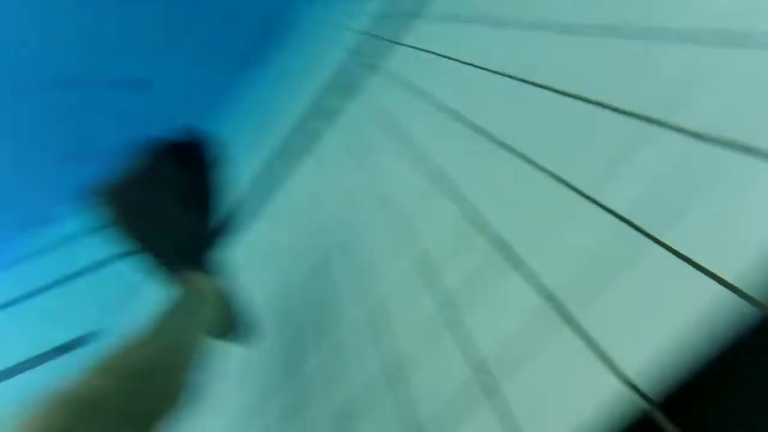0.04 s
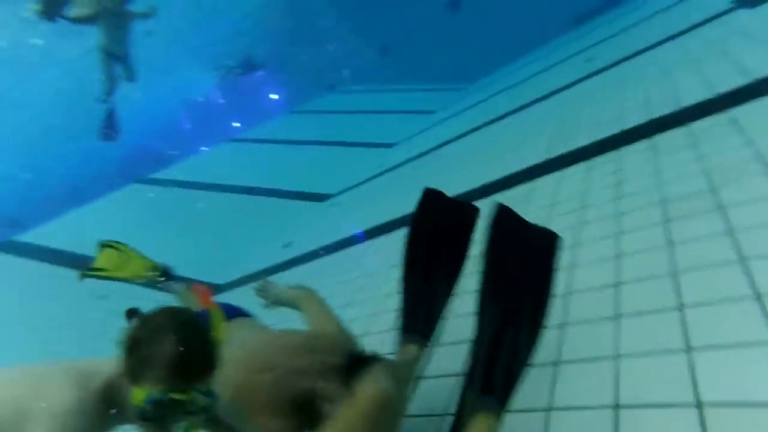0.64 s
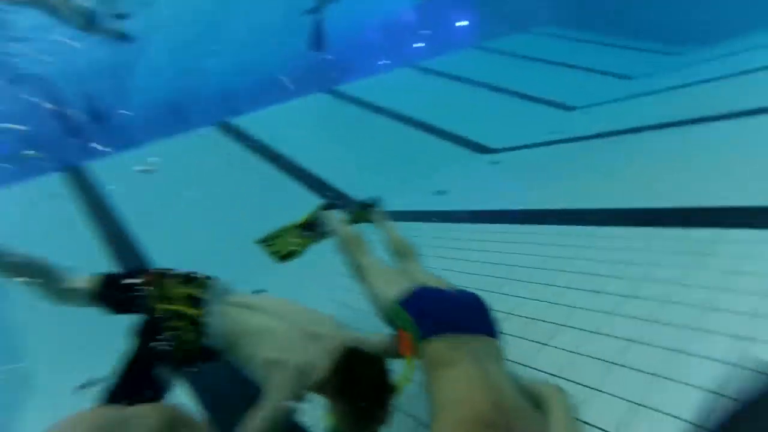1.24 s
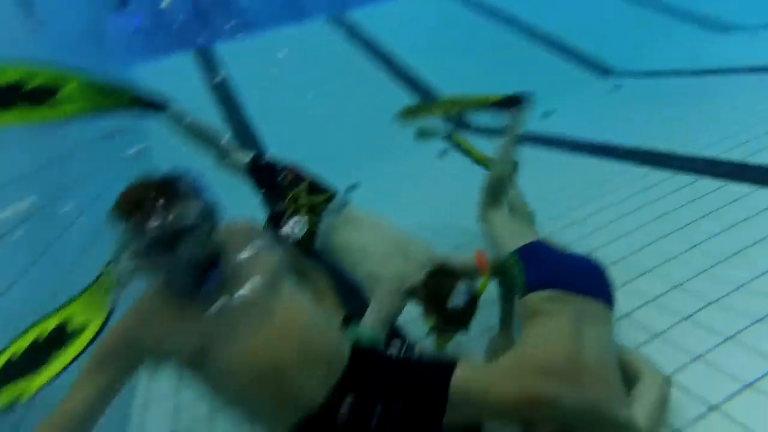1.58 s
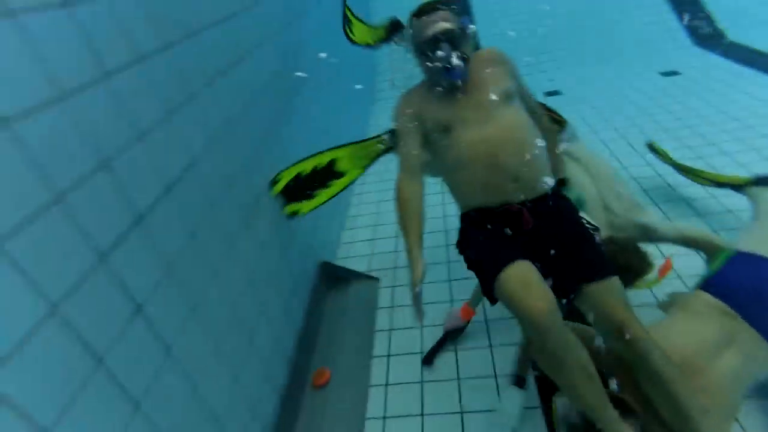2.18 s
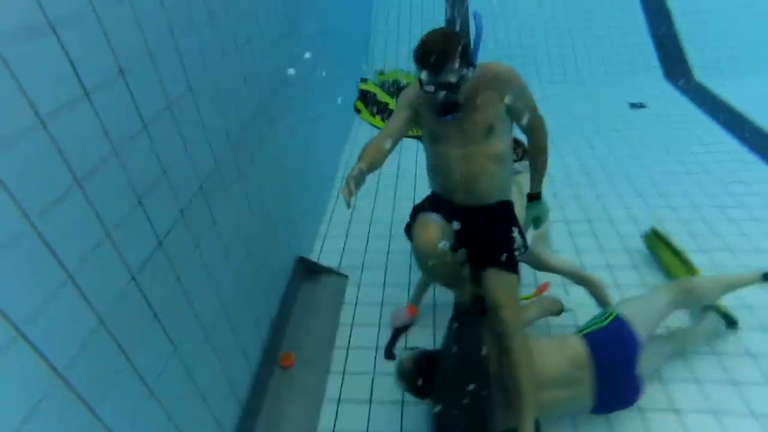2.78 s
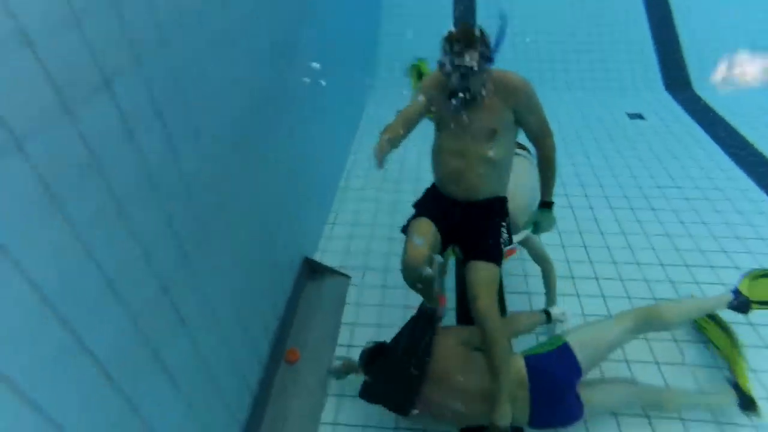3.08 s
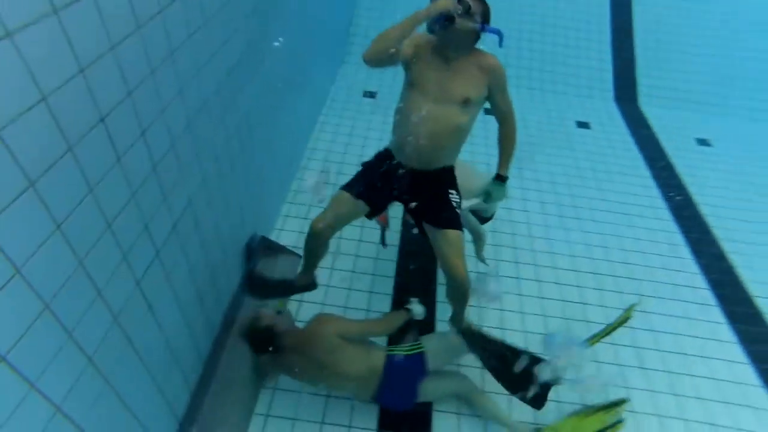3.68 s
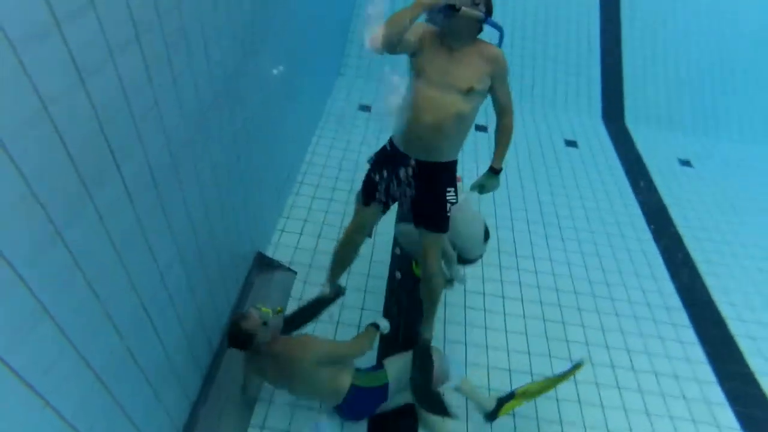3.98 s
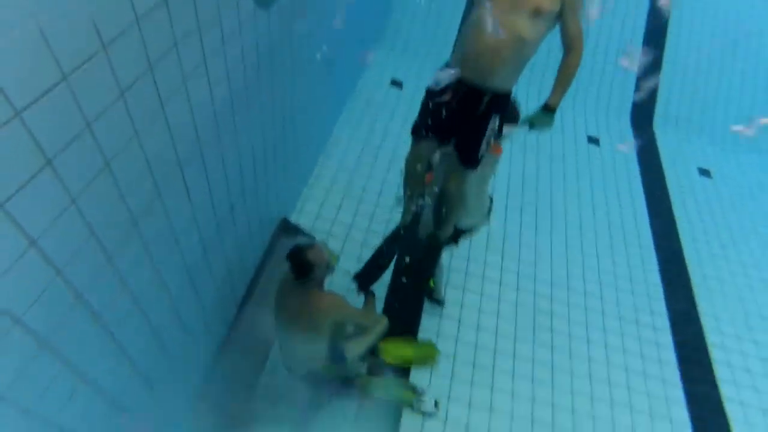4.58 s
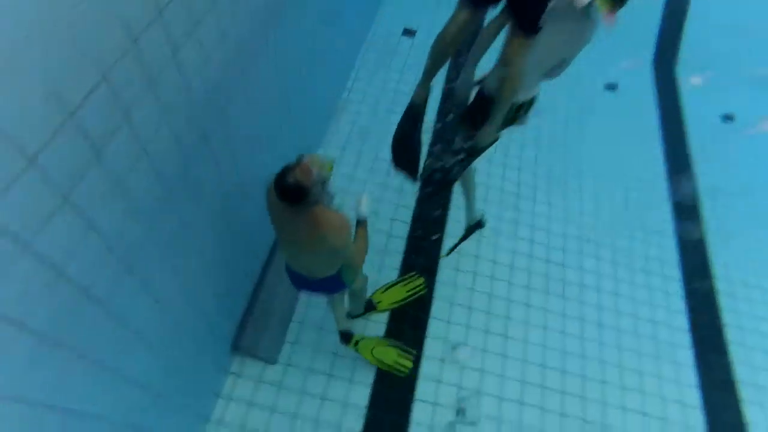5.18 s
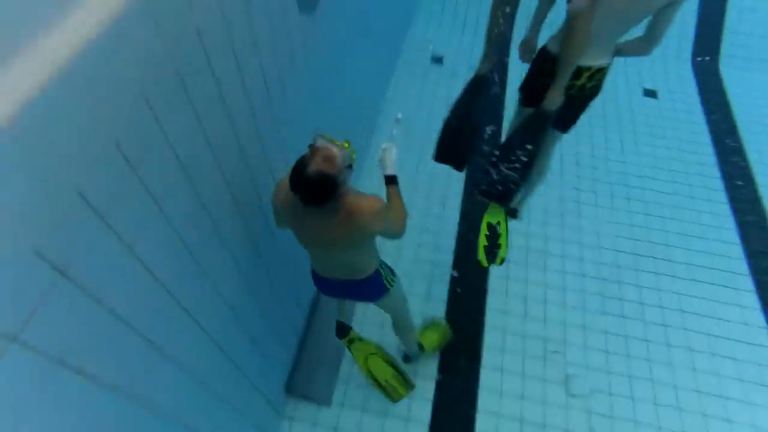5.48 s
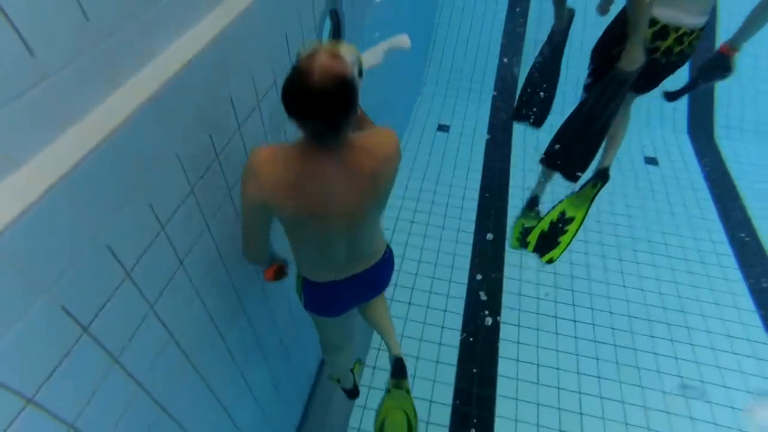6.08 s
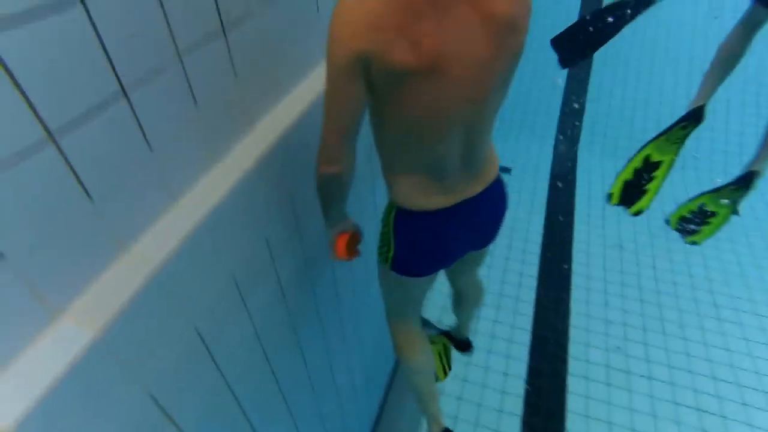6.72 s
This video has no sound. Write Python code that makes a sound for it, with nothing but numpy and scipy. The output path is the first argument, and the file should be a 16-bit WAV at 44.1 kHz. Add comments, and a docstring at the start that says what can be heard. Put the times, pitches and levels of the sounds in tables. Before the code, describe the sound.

Underwater in a swimming pool, water rumbles against a camera housing while fins churn up a dull, fizzing wash. Sticks and a puck clack on the tiled floor, and about two seconds in the puck booms and rattles into a steel tray. Tiny bubbles pop past, then big gulps of air break loose around four seconds. A short rising blurt of air comes near the end, and the water settles.

```python
"""Underwater hockey, heard from a camera housing near the pool floor. From the start, flow rumbles on the
housing, fins churn up a fizzing wash and sticks and puck clack on the tiles; air gulps, small bubbles
plink and the pool rings in answer. At 2 s the puck booms and rattles into the steel goal tray. Tiny bubbles
pop past, a jet swishes out, and just after 4 s the biggest gulps break loose. Near 6 s comes one rising
blurt of air, then the water settles."""
import sys
import numpy as np
from scipy import signal
from scipy.fft import rfft, irfft, next_fast_len
from scipy.io import wavfile
from scipy.ndimage import uniform_filter1d, map_coordinates

SR = 44100
rng = np.random.default_rng(int(sys.argv[2]) if len(sys.argv) > 2 else 0)


def generate_wav(sig):
    """Save sig (samples, or channels by samples) to the path in sys.argv[1] as 16-bit PCM at SR."""
    pcm = np.round(np.clip(np.atleast_2d(sig).T, -1, 1) * 32767).astype(np.int16)
    wavfile.write(sys.argv[1], SR, pcm)


N = 302085

# Levels are relative, ahead of each layer's own gain. A colour is the spectral shape of a noise.
# flow round the moving housing: (time [s], level [dB])
FLOW_LEVEL = [(0, -17.5), (.6, -21.5), (1.7, -24.5), (2.25, -23.5), (2.8, -25.5), (3.7, -25), (4.25, -24),
              (4.7, -29), (5.3, -25), (6.85, -32)]
# its rumble: (frequency [Hz], level [dB])
RUMBLE_COLOUR = [(5, 17.5), (12, 9), (20, 1), (32, -4), (50, -16), (80, -24.5), (140, -33), (250, -40.5),
                 (500, -75.5), (1000, -89.5)]
# how hard the fins churn: (time [s], level [dB])
CHURN_LEVEL = [(0.0, -39), (0.82, -44.5), (1.43, -35.5), (1.96, -38.5), (2.27, -36.5), (2.82, -43),
               (3.28, -38.5), (3.7, -39.5), (4.25, -32.5), (4.7, -36), (5.13, -35), (5.38, -47.5),
               (5.59, -45), (5.76, -38), (6.14, -41), (6.32, -46), (6.85, -52)]
# the dull rush of stirred water: (frequency [Hz], level [dB])
RUSH_COLOUR = [(60, -47.5), (150, -14), (240, -11), (320, -1), (420, 2.5), (510, 8.5), (600, -9),
               (730, -13), (900, -11.5), (1050, -48), (1600, -43), (3000, -70)]
# standing waves between floor and wall: (frequency [Hz], level [dB])
STANDING_WAVES = [(146, -7), (178, -4), (326, 3.5), (352, -2), (385, -3.5), (456, 0.5), (484, -1.5),
                  (514, 0.5), (541, 0.5), (582, -2.5), (665, -1.5), (748, -2)]
# the hollow haze round gulps and wash: (frequency [Hz], level [dB])
HAZE_COLOUR = [(900, -6), (1300, -24), (1690, 14), (2300, -15), (2850, 5.5), (3400, -32.5), (4020, 6.5),
               (4500, -37.5), (5150, 0), (5750, -28.5), (6400, -6.5), (7600, -9.5), (10500, -14.5),
               (15000, -9.5)]
# the bed of fine fizz and far clatter: (time [s], level [dB])
FIZZ_LEVEL = [(0.0, -54.5), (0.67, -67.5), (0.93, -71), (1.22, -63), (1.96, -64), (2.21, -51), (2.4, -60),
              (3.15, -68), (3.81, -70), (3.97, -73), (4.67, -75.5), (5.49, -69), (5.82, -67), (6.85, -67.5)]
# that bed's tone: (frequency [Hz], level [dB])
BED_COLOUR = [(500, 3.5), (900, 7), (1400, -8), (2100, -5), (2800, 5.5), (3500, -17.5), (4700, -10.5),
              (6000, -32), (7400, -30.5), (10000, -22.5), (15000, -32.5)]
# the faint hiss on top: (frequency [Hz], level [dB])
TOP_HISS_COLOUR = [(1000, -2), (3500, 0), (4800, 5), (6000, 0), (7400, 7.5), (8500, 0), (9700, 3.5),
                   (12000, -4), (15500, -11.5)]
# the lower, swelling part of the fizz: (frequency [Hz], level [dB])
SEETHE_COLOUR = [(800, -8), (1200, 1), (1800, 1), (2400, -0.5), (3200, -19)]
# sticks and puck on the tiles: (time [s], level [dB], pool echo [dB], ring [dB])
TILE_HITS = [(0.0, -35, -3, -21), (0.0823, -27.5, -23, -17), (1.526, -29.5, -17, -7),
             (1.531, -35.5, -13, -14), (1.862, -41, -18, -13), (2.003, -38.5, -14, -16),
             (2.582, -49, -25, -14), (2.5881, -23, -16.5, -1), (2.5915, -28, -12, -6),
             (2.676, -43.5, -4.5, -8)]
# the crack of such a blow: (frequency [Hz], level [dB])
CRACK_COLOUR = [(400, -12), (900, -11), (1650, -9.5), (1950, -0.5), (2750, 4.5), (3100, -8.5), (3400, -20),
                (3900, -8.5), (4800, -19), (6200, -23), (7500, -18.5), (8300, -35), (9600, -18.5),
                (12000, -40), (15500, -36)]
# its ring: (frequency [Hz], level [dB])
BLOW_MODES = [(2000, -2.5), (2223, -2), (2471, -9.5), (2573, -4), (2678, 2.5), (2790, -10)]
# dark, low ringing notes: gulps of air, and at 2.03 s the boom of the puck meeting the tray:
# (time [s], level [dB], pitch [Hz], t60 [s], deep level [dB], deep pitch [Hz])
DARK_NOTES = [(0.079, -4.5, 560, 0.012, -39.5, 347), (0.284, -13.5, 510, 0.019, -52, 402),
              (0.323, -17.5, 569, 0.092, -47, 415), (0.866, -16.5, 460, 0.033, -35, 386),
              (0.87, -29.5, 714, 0.13, -45, 391), (0.971, -21.5, 489, 0.088, -39, 304),
              (1.272, -20.5, 510, 0.15, -37, 413), (1.424, -19, 550, 0.12, -46, 420),
              (1.486, -26, 466, 0.54, -34, 276), (1.528, -19.5, 526, 0.12, -50, 432),
              (1.686, -25, 457, 0.16, -29.5, 412), (1.175, -26.5, 478, 0.093, -40, 394),
              (1.865, -23.5, 453, 0.13, -34, 381), (2.032, -19.5, 520, 0.095, -34, 408),
              (2.259, -37, 505, 0.083, -24, 317), (2.472, -20.5, 537, 0.097, -33.5, 423),
              (2.553, -19, 427, 0.037, -33, 299), (2.663, -31, 503, 0.12, -30.5, 303),
              (3.324, -14.5, 490, 0.042, -39, 407), (3.578, -6, 500, 0.016, -22, 299.6),
              (3.792, -17, 398, 0.15, -20.5, 303), (3.942, -13.5, 613, 0.037, -16.5, 330.5),
              (4.044, 1, 571.5, 0.063, -7, 354.8), (4.061, -9, 620, 0.055, -18, 370),
              (4.082, -10.5, 539, 0.13, -14, 380), (4.162, -12, 546.4, 0.23, -28.5, 171.5),
              (4.131, -2, 460, 0.037, -12.5, 400), (4.189, -21, 540, .08, -18, 315),
              (4.297, -22, 482, .05, -23.5, 341), (4.33, -20, 546, 0.09, -21, 312.4),
              (4.381, -4, 483, 0.075, -17.5, 374.6), (4.472, -38, 525, 0.088, -20.5, 331.5),
              (4.545, -16.5, 551, 0.2, -21.5, 314), (4.602, -10.5, 497, 0.037, -19.5, 340.6),
              (4.7, -33, 456, .25, -26.5, 325), (4.817, -24.5, 512, 0.5, -21, 350),
              (4.9, -28, 524, 0.15, -23.5, 342.7), (4.994, -28.5, 571, 0.15, -35, 346),
              (5.148, -18, 503, 0.062, -29, 378.4), (5.225, -23, 520, 0.051, -50, 367),
              (5.282, -24, 554, 0.034, -41, 370), (5.365, -22.5, 612, 0.073, -37, 380),
              (5.579, -25.5, 414, 0.078, -28.5, 370), (5.6625, -13.5, 640, 0.03, -19, 384.7),
              (5.833, -15, 630, 0.04, -16.5, 410.3), (5.867, -12, 428, 0.13, -35, 394),
              (6.266, -34.5, 544.6, 0.31, -30, 366)]
# dry ticks on the housing: (time [s], level [dB], centre [Hz])
HOUSING_TICKS = [(0.082, -19.5, 8400), (0.1236, -36, 4000), (0.162, -29, 3200), (1.4223, -29, 3900),
                 (0.287, -35, 3050), (3.146, -38, 4100), (3.2889, -34, 6500), (3.755, -35, 6760),
                 (3.467, -39.5, 4910), (3.7254, -34.5, 3400), (4.0457, -16, 3560), (4.0986, -24, 8830),
                 (4.2964, -23.5, 3250), (4.4108, -9.5, 4130)]
# air tearing loose: (crest time [s], level [dB], pitch [Hz], half length [s])
AIR_TEARS = [(0.326, -37.5, 820, .0065), (1.26, -44, 880, .006), (0.655, -39.5, 860, .012),
             (3.056, -36, 700, .006), (3.17, -43, 900, .009), (3.335, -40, 720, .007),
             (3.365, -37.5, 850, .012), (3.412, -31.5, 790, .007), (3.435, -42, 870, .008),
             (3.8, -28, 760, .0072), (3.893, -44, 1180, .016), (4.048, -2, 315, .004),
             (4.085, -22, 428, .012), (4.146, -11, 335, .0035), (4.154, -17, 230, .008),
             (4.177, -17, 165, .007), (4.198, -21, 543, .018), (4.25, -30, 178, .025),
             (4.368, -40, 1050, .008), (4.386, -27, 880, .006), (4.52, -27, 450, .011),
             (4.731, -28, 455, .012), (5.151, -34.5, 680, .01), (5.227, -22, 368, .014),
             (5.538, -32.5, 617, .009), (5.942, -34, 720, .01), (5.962, -43, 920, .009),
             (6.14, -39, 700, .012)]
# small bubbles pinching off close by: (time [s], level [dB], nominal pitch [Hz], t60 [s])
NEAR_BUBBLES = [(0.615, -52.5, 1780, 0.032), (0.749, -54, 1350, .04), (0.973, -45.5, 1870, 0.044),
                (1.033, -51.5, 1290, 0.089), (1.1622, -39, 1140, 0.025), (1.822, -42.5, 2200, 0.019),
                (2.47, -46.5, 2250, 0.061), (2.748, -49, 1250, .035), (2.869, -49, 2050, 0.026),
                (2.9121, -36.5, 1276, 0.04), (2.913, -35, 2400, 0.017), (3.011, -56, 1370, 0.026),
                (3.035, -49.5, 2500, .025), (3.089, -50.5, 2430, 0.026), (3.1782, -29.5, 1257, 0.021),
                (3.5052, -30, 1680, .025), (3.581, -33, 1048, 0.077), (3.727, -38.5, 1325, 0.04),
                (3.795, -24.5, 840, 0.086), (3.8893, -32, 1090, 0.049), (4.0455, -12, 1400, 0.01),
                (4.082, -27, 1970, 0.019), (4.129, -21.5, 2200, 0.033), (4.279, -30, 1370, 0.0053),
                (4.298, -37.5, 1300, 0.012), (4.382, -27.5, 956, 0.054), (4.5522, -41.5, 1730, 0.043),
                (4.606, -35, 1063, 0.043), (5.032, -47.5, 2440, 0.026), (5.3575, -36.5, 1250, 0.016),
                (6.0912, -46, 2560, 0.029)]
# ragged runs of small bubbles: (time [s], level [dB], length [s], centre [Hz])
BUBBLE_RUNS = [(0.63, -49, .06, 840), (0.97, -42, .012, 2090), (1.074, -48, .015, 2500),
               (1.085, -52, 0.036, 1350), (1.106, -45, 0.021, 2380), (1.162, -43, 0.023, 2020),
               (1.228, -50, 0.009, 1900), (1.606, -48.5, 0.047, 1490), (3.309, -50, .13, 876),
               (3.764, -46, 0.0067, 1950), (3.886, -44, 0.047, 1040), (3.889, -38, .01, 1820)]
# deep swells of water, mostly after big gulps and the tray crash: (crest time [s], level [dB], t60 [s])
LOW_SURGES = [(0.95, -36, 1.2), (2.14, -33, 0.85), (2.45, -32.5, 1.2), (4.16, -26, 1.1),
              (4.52, -35.5, 0.47), (5.87, -35, 0.51)]
# the puck rattling in the goal tray: (time [s], level [dB])
PUCK_CONTACTS = [(2.032, -44.5), (2.080, -29), (2.094, -31), (2.105, -34.5), (2.119, -33.5), (2.154, -32.5),
                 (2.183, -36.5), (2.247, -42.5), (2.354, -51.5)]
# the steel's ring: (frequency [Hz], level [dB])
STEEL_MODES = [(1985, -8), (2234, -20.5), (2680, -8), (4174, -10.5)]
# the tray's clatter: (frequency [Hz], level [dB])
CLATTER_COLOUR = [(200, -11), (490, 14), (750, 1), (1500, -3), (2100, 3.5), (2850, 5), (3400, -13.5),
                  (4200, -2.5), (5100, -27), (6500, -23)]
# its bright grit: (frequency [Hz], level [dB])
STEEL_GRIT_COLOUR = [(3500, -22), (5000, 4.5), (6300, -11), (7400, 5), (8400, -3), (9700, 3), (12500, -17),
                     (15700, -22)]
# puffs of very fine bubbles: (crest time [s], level [dB], half length [s])
SPRAY_PUFFS = [(3.358, -64, 0.068), (5.737, -63, 0.09)]
# the blurt's harmonics, lowest first: (level [dB])
BLURT_HARMONICS = [-25.5, -18, -15]
# the jet of fine bubbles: (frequency [Hz], level [dB])
JET_COLOUR = [(900, -10), (1400, 1), (1900, 9), (2850, 6), (3500, -9), (4700, -3), (6000, -15), (7500, -3),
              (9700, -7), (12000, -16), (15500, -24)]
# deep water surge, bubble snap, tray boom and fine spray: (frequency [Hz], level [dB])
SURGE_COLOUR = [(50, -0.5), (110, -0.5), (200, -5.5), (280, 2), (400, -25)]
SNAP_COLOUR = [(600, -1.5), (1200, 14), (2700, 1.5), (5000, -14.5), (15000, -23)]
BOOM_COLOUR = [(280, -9), (400, -15.5), (460, 3), (520, -1), (590, -10), (800, -24.5)]
SPRAY_COLOUR = [(1000, 5), (1900, -2.5), (2800, 10.5), (3500, -3.5), (6000, -4.5), (8500, -0.5),
                (15000, -27)]

TIME = np.arange(N) / SR


def amp(db):
    """Decibels to gain."""
    return 10 ** (np.asarray(db) / 20)


def unit(x):
    """x at rms 1."""
    return x / np.sqrt(np.mean(x ** 2) + 1e-20)


def clock(seconds):
    """Sample times over a duration."""
    return np.arange(int(seconds * SR)) / SR


def fade(t, t60):
    """Exponential decay, 60 dB down at t60."""
    return np.exp(-np.log(1000) * t / t60)


def onset(t, attack):
    """A rise from 0 to 1 with time constant attack [s]."""
    return 1 - np.exp(-t / attack)


def swell(t, half):
    """A bell-shaped envelope cresting at t = 0."""
    return np.exp(-.5 * (t / half) ** 2)


def curve(rows):
    """(time [s], value) rows as one value per sample."""
    return np.interp(TIME, *np.transpose(rows))


def wobble(rate):
    """A smooth random curve, rate knots a second."""
    return map_coordinates(rng.standard_normal(int(N * rate / SR) + 4), [TIME * rate])


def noise(colour, size):
    """Noise of rms 1 in the given colour."""
    padded = next_fast_len(size + 8192)
    hz, db = np.transpose(colour)
    log_bins = np.log(np.fft.rfftfreq(padded, 1 / SR) + 1)
    gain = amp(np.interp(log_bins, np.log(hz), db, left=-120, right=-120))
    return unit(irfft(rfft(rng.standard_normal(padded)) * gain, padded)[:size])


def patchy_noise(colour, depth_db, frame):
    """Coloured noise with random patches of gain in time and pitch; frame is in samples."""
    spectrum = signal.stft(noise(colour, N), nperseg=frame)[2]
    patches = uniform_filter1d(rng.standard_normal(spectrum.shape), size=4, axis=0)
    patches = unit(uniform_filter1d(patches, size=2, axis=1))
    return unit(signal.istft(spectrum * amp(depth_db * patches), nperseg=frame)[1][:N])


def partials(t, modes):
    """Steady sines at random phases, one for each mode."""
    return sum(amp(db) * np.sin(2 * np.pi * (hz * t + rng.random())) for hz, db in modes)


def add(track, s, sound):
    """Mix a sound into the track at time s."""
    part = track[max(round(s * SR), 0):][:len(sound)]
    part += sound[:len(part)]


def bubble(t, hz, t60, attack, glide=0):
    """Air pulsing in water: a damped sine whose pitch drifts by the share glide while it rings."""
    pitch = hz * (1 + glide * (1 - fade(t, t60)))
    return np.sin(2 * np.pi * np.cumsum(pitch) / SR) * fade(t, t60) * onset(t, attack)


def housing_rumble():
    """Eddies rumble on the housing, and one soft bump pushes it."""
    out, t = amp(curve(FLOW_LEVEL)) * noise(RUMBLE_COLOUR, N), clock(.15)
    bump = -amp(-2.5) * onset(t, .0021) ** 2 * fade(t, .078)
    add(out, 2.737, bump)
    return out


def fin_wash():
    """Fins stir a cloud of bubbles over a dull, uneven rush; a deep surge swells beneath."""
    cloud, t, count = np.zeros(N), clock(.13), 1100
    starts = rng.uniform(0, N / SR, count)
    for s, (pitch, life, size) in zip(starts, rng.standard_normal((count, 3))):
        hz = 470 * np.exp(.27 * pitch)
        ring = bubble(t, hz, t60=.17 * np.exp(.18 * life), attack=.00089, glide=.032)
        add(cloud, s, amp(3 * size - 2.3 * pitch ** 2) * ring)
    rush = patchy_noise(RUSH_COLOUR, depth_db=5.5, frame=2048)
    surge = patchy_noise(SURGE_COLOUR, depth_db=5.5, frame=2048)
    churn = amp(-5) * unit(cloud) + amp(-1.5) * rush + amp(-15) * surge
    return amp(curve(CHURN_LEVEL)) * churn + surge_envelope() * surge


def pool_ring(drive, t60=.42):
    """The water between floor and wall rings on at its own pitches."""
    t = clock(t60)
    decay = fade(t, t60)
    waves = sum(amp(db) * np.cos(2 * np.pi * hz * t) for hz, db in STANDING_WAVES)
    return signal.fftconvolve(drive, waves * 2 * decay / decay.sum())[:N]


def hollow_edge(drive, spacing_hz=1143):
    """A metallic edge: faint side tones of the drive round an even comb of pitches, in a ringing haze."""
    t = clock(.2)
    comb = sum(np.cos(2 * np.pi * (k * spacing_hz * TIME + rng.random())) / k ** .92 for k in range(1, 11))
    haze = signal.fftconvolve(rng.standard_normal(N), noise(HAZE_COLOUR, len(t)) * fade(t, .28))[:N]
    envelope = np.sqrt(np.abs(uniform_filter1d(drive ** 2, size=130)))
    return amp(-37) * drive * unit(comb) + amp(-39) * envelope * unit(haze)


def fizz():
    """Far clatter and tiny bubbles: a flickering bed, a lower seethe, puffs of spray and a faint hiss."""
    level_db = curve(FIZZ_LEVEL)
    bed = amp(level_db + .5 + 2 * wobble(30)) * patchy_noise(BED_COLOUR, depth_db=4.5, frame=512)
    settle_db = 4 * np.maximum(TIME - 3.7, 0)  # dies down once the wrestling for the puck stops
    seethe_db = level_db - 5.5 + 3.5 * wobble(12) - settle_db
    seethe = amp(seethe_db) * patchy_noise(SEETHE_COLOUR, depth_db=4.5, frame=512)
    puffs = sum(amp(db) * swell(TIME - s, half) for s, db, half in SPRAY_PUFFS)
    spray = noise(SPRAY_COLOUR, N)
    hiss = patchy_noise(TOP_HISS_COLOUR, depth_db=3, frame=512)
    grain = amp(5 * wobble(370))
    return bed + seethe + puffs * unit(spray * grain) + amp(-74) * hiss


def crackle():
    """Countless tiny bubbles burst, a few louder than the rest; the smaller and later, the fainter."""
    out, t, count = np.zeros(N), clock(.02), 3200
    starts = rng.uniform(0, N / SR, count)
    for s, (pitch, accent) in zip(starts, rng.random((count, 2))):
        hz = 1500 * 7.5 ** pitch
        db = -64.5 + 19 * accent ** 30 - .6 * s - pitch
        add(out, s, amp(db) * bubble(t, hz, t60=26 / hz, attack=.00019))
    return out


def tile_clacks():
    """A hard blow on the tiles: a short crack and a tight ring, then the echo of the pool."""
    out, t = np.zeros(N), clock(.7)
    for s, db, echo_db, ring_db in TILE_HITS:
        echo = amp(echo_db) * fade(t, .23)
        crack = noise(CRACK_COLOUR, len(t)) * np.hypot(fade(t, .034), echo)
        ring = amp(ring_db) * partials(t, BLOW_MODES) * np.hypot(fade(t, .044), echo)
        add(out, s, amp(db) * (crack + ring) * onset(t, .00048))
    return out


def dark_notes():
    """Gulps of air and one tray boom ring with a main note and a deep one; the pool walls prolong them."""
    out, t = np.zeros(N), clock(.4)
    for s, db, hz, t60, deep_db, deep_hz in DARK_NOTES:
        attack = .0017 * (t60 / .029) ** .54  # short notes start suddenly, long ones swell
        deep = bubble(t, deep_hz, .23, attack)
        knock = amp(-5) * bubble(t, deep_hz, .038, attack)
        ring = amp(db) * bubble(t, hz, t60, attack) + amp(deep_db) * (deep + knock)
        walls = rng.standard_normal(len(t)) * fade(t, .45) * onset(t, .018)
        echo = signal.fftconvolve(ring, walls / np.linalg.norm(walls))[:len(t)]
        add(out, s, ring + amp(-19) * echo)
    return signal.sosfilt(signal.butter(4, 970, 'lowpass', fs=SR, output='sos'), out)


def housing_ticks():
    """Dry ticks on the housing, each a few milliseconds of noise in a broad hump."""
    out, t = np.zeros(N), clock(.04)
    octaves = np.linspace(-3, 3, num=13)
    hump_db = -6 * np.abs(octaves) ** 1.4 - 9 * np.maximum(octaves, 0)
    for s, db, hz in HOUSING_TICKS:
        burst = noise(np.c_[hz * 2 ** octaves, hump_db], len(t))
        add(out, s, amp(db - 8) * burst * fade(t, .0098) * onset(t, .00069))
    return out


def burble(clusters=22, until_s=3.8):
    """While the players wrestle for the puck, faint bubbles further off chirp in clusters of five."""
    out, t = np.zeros(N), clock(.06)
    starts = (rng.uniform(0, until_s, (clusters, 1)) + rng.uniform(0, .1, (clusters, 5))).ravel()
    for s, (pitch, size, drift) in zip(starts, rng.random((len(starts), 3))):
        hz = 827 * 2 ** (1.64 * pitch)
        ring = bubble(t, hz, t60=40 / hz, attack=.9 / hz, glide=.2 * (drift - .5))
        add(out, s, amp(-54 + 10.6 * size ** 2 - 4 * pitch) * ring)
    return out


def gurgle(crest_s, db, hz, half, rise_per_s=0):
    """Air tears loose in a swelling, ragged tone."""
    out, lead_s = np.zeros(N), .1
    t = clock(2 * lead_s) - lead_s
    jostle = uniform_filter1d(rng.standard_normal((2, len(t))), size=160)
    jitter, flutter = unit(uniform_filter1d(jostle, size=160))
    rough = .58 * (hz / 800) ** 1.4  # smaller bubbles jostle more
    phase = 2 * np.pi * hz * (t + rise_per_s * t ** 2 / 2) + rough * jitter
    add(out, crest_s - lead_s, amp(db + 2 * rough * flutter) * np.sin(phase) * swell(t, half))
    return out


def plinks():
    """Small bubbles snap free and ring briefly, starting sharp and sinking in pitch."""
    out, t = np.zeros(N), clock(.1)
    for s, db, hz, t60 in NEAR_BUBBLES:
        ring = bubble(t, hz * 1.062, t60, attack=.9 / hz, glide=-.081)
        snap = noise(SNAP_COLOUR, len(t)) * fade(t, .026)
        bite = min(hz / 1410, 1) ** 2  # larger, lower bubbles snap less
        add(out, s, amp(db) * (amp(4) * ring + amp(-12) * bite * snap))
    return out


def splutters(bubbles_per_s=380):
    """A little air tears into a quick, ragged run of tiny bubbles."""
    out, t = np.zeros(N), clock(.04)
    for s, db, length, centre_hz in BUBBLE_RUNS:
        count = 1 + int(bubbles_per_s * length)
        for k, (late, pitch, size) in enumerate(rng.uniform(-1, 1, (count, 3))):
            hz = centre_hz * 2 ** (.38 * pitch)
            ring = bubble(t, hz, t60=32 / hz, attack=1 / hz)
            add(out, s + (k + late / 2) / bubbles_per_s, amp(db + 3.3 * size - 4 * pitch ** 2) * ring)
    return out


def surge_envelope(rise_s=.053):
    """The level of the deep swells of water: each rises quickly and dies away."""
    return sum(amp(db) * np.exp(np.minimum(TIME - s, 0) / rise_s) * fade(np.maximum(TIME - s, 0), t60)
               for s, db, t60 in LOW_SURGES)


def goal_tray(impacts_per_s=130):
    """The puck sets the steel tray ringing and chattering: ring and grit die first, the low boom last."""
    out, t, tap = np.zeros(N), clock(.8), clock(.01)
    for s, db in PUCK_CONTACTS:
        ring = amp(-3.5) * partials(t, STEEL_MODES) * fade(t, .27)
        grit = amp(-10) * noise(STEEL_GRIT_COLOUR, len(t)) * fade(t, .24)
        impacts = (rng.random(len(t)) < impacts_per_s / SR) * rng.uniform(-.75, 1, len(t))
        click = noise(CLATTER_COLOUR, len(tap)) * fade(tap, .008)
        chatter = unit(signal.fftconvolve(impacts, click)[:len(t)])
        clatter = amp(-6) * unit(.7 * chatter + noise(CLATTER_COLOUR, len(t))) * fade(t, .49)
        boom = amp(7) * noise(BOOM_COLOUR, len(t)) * fade(t, .68)
        add(out, s, amp(db) * (ring + grit + clatter + boom))
    return out


def pops(around_s=3.37, count=34):
    """A handful of tiny bubbles drift past the housing and pop one by one."""
    out, t = np.zeros(N), clock(.02)
    for s, (pitch, faintness) in zip(rng.normal(around_s, .17, count), rng.random((count, 2))):
        hz = 3800 * 2.7 ** pitch
        add(out, s, amp(-41 - 10 * faintness) * bubble(t, hz, t60=15 / hz, attack=.00016))
    return out


def jet_swish(start_s=3.85, hold_s=.014):
    """A dense jet of fine bubbles starts at once, holds briefly and thins away."""
    out, t = np.zeros(N), clock(.3)
    envelope = onset(t, .005) * fade(np.maximum(t - hold_s, 0), .34)
    jet = noise(JET_COLOUR, len(t))
    grain = amp(3 * wobble(700)[:len(t)])
    add(out, start_s, amp(-48) * envelope * unit(jet * grain))
    return out


def blurt(crest_s=5.846, hz=216.4):
    """A big tear of air: a rising stack of gurgles in harmonic tune."""
    return sum(gurgle(crest_s, db, k * hz, half=.011, rise_per_s=4.4)
               for k, db in enumerate(BLURT_HARMONICS, 1))


def scene():
    """Everything reaches one microphone through the water; low tones and wash set the pool ringing."""
    low_tones = dark_notes() + sum(gurgle(*tear) for tear in AIR_TEARS) + blurt()
    wash = amp(-4) * fin_wash()
    pool = pool_ring(amp(-11) * low_tones + amp(3) * wash)
    edge = hollow_edge(low_tones + amp(-5.5) * (wash + pool))
    small_bubbles = plinks() + splutters() + burble() + jet_swish() + fizz() + crackle() + pops()
    hits = housing_ticks() + tile_clacks() + goal_tray()
    return (low_tones + wash + pool + edge + small_bubbles + hits + housing_rumble())[None]


def record(dry):
    """The camera rounds off the loudest peaks and keeps nothing above its band limit; the ends are eased."""
    ease_s, top_hz = .008, 15800
    rounded = dry / (1 + np.abs(dry) ** 8) ** (1 / 8)
    ease = np.minimum(np.minimum(TIME, TIME[::-1]) / ease_s, 1)
    padded = next_fast_len(N + SR // 2)
    passband = np.fft.rfftfreq(padded, 1 / SR) < top_hz
    return irfft(rfft(rounded * ease, padded) * passband, padded)[..., :N]


dry = scene()
out = record(dry)
generate_wav(out)
```